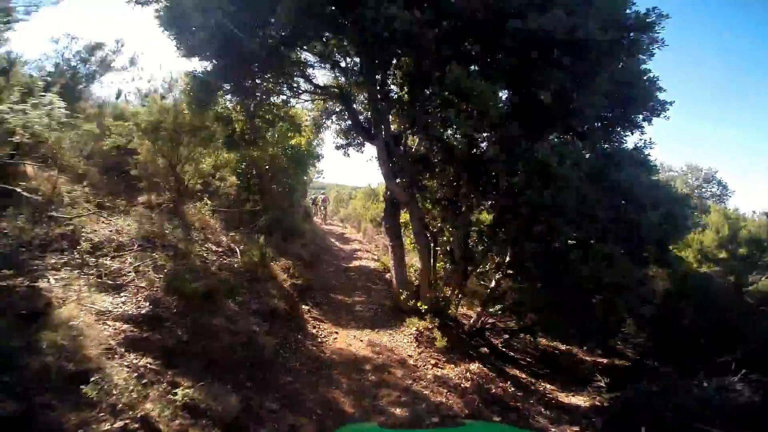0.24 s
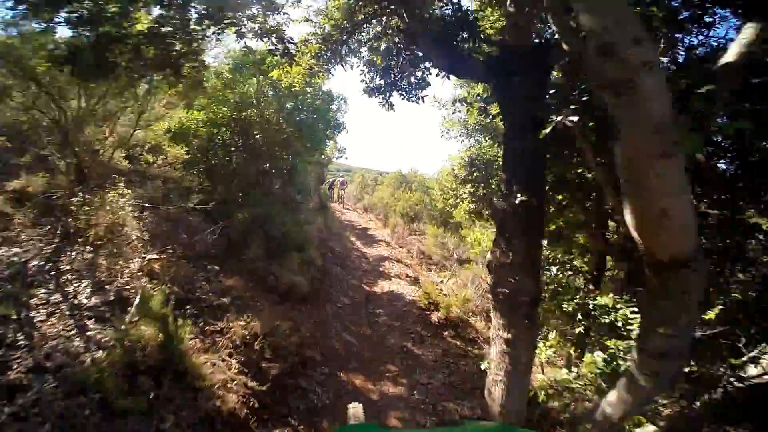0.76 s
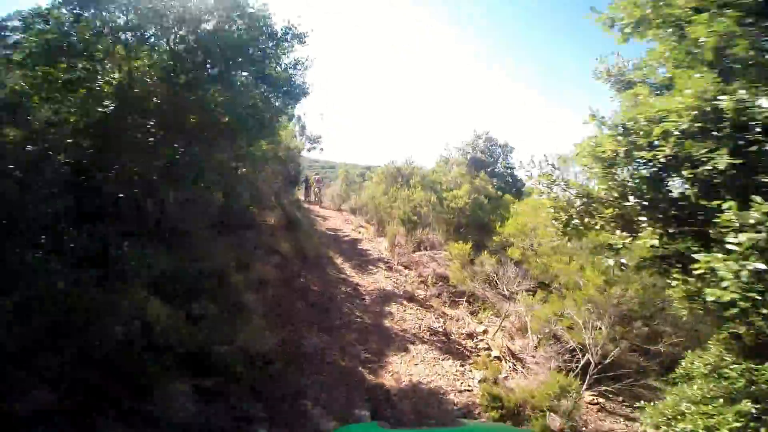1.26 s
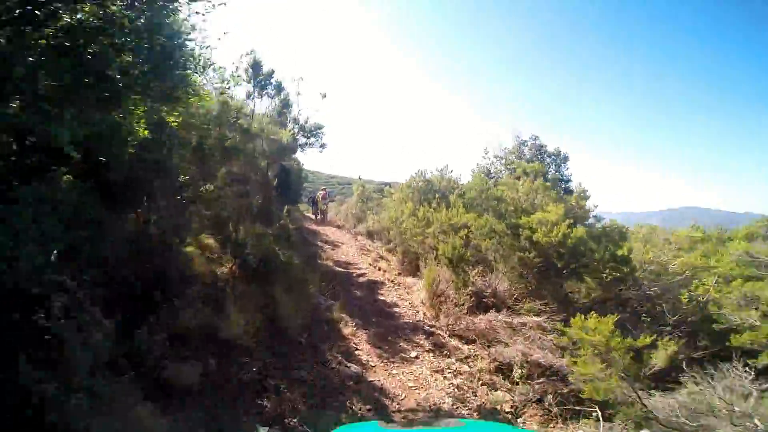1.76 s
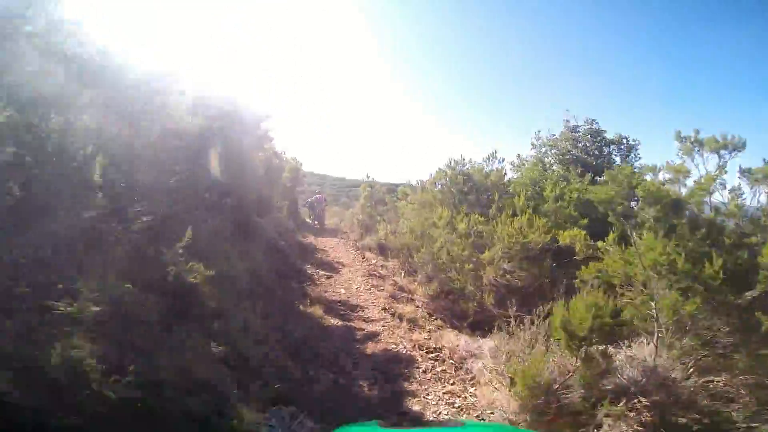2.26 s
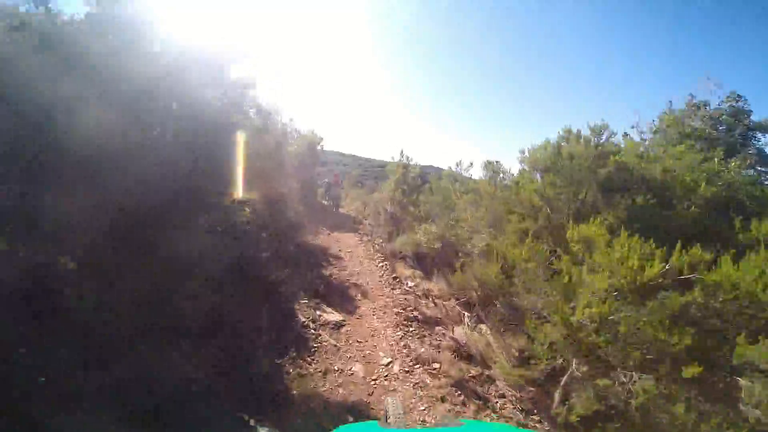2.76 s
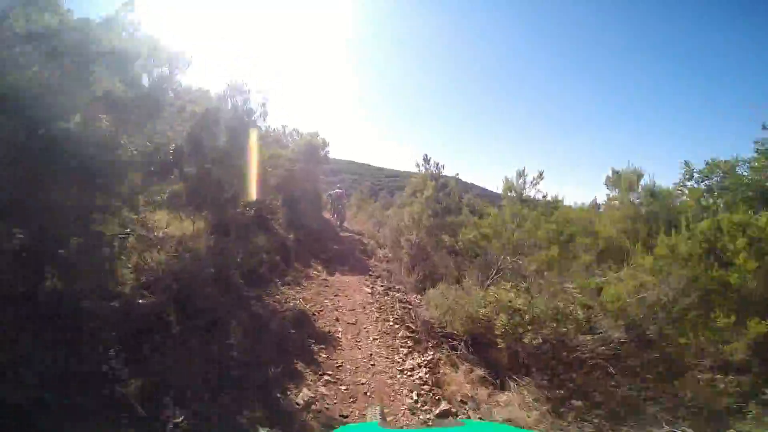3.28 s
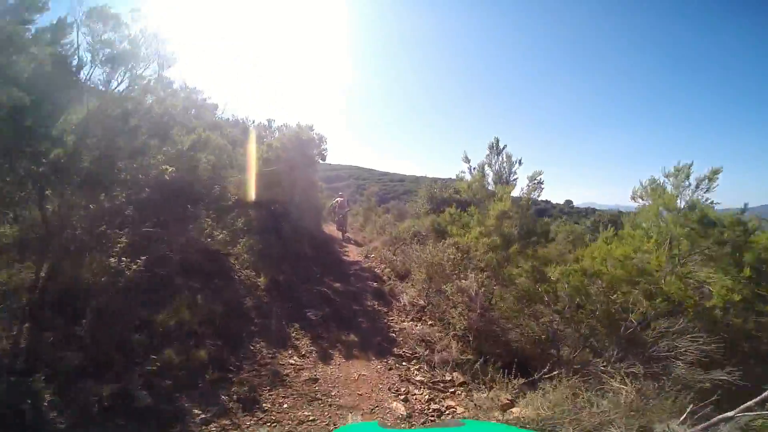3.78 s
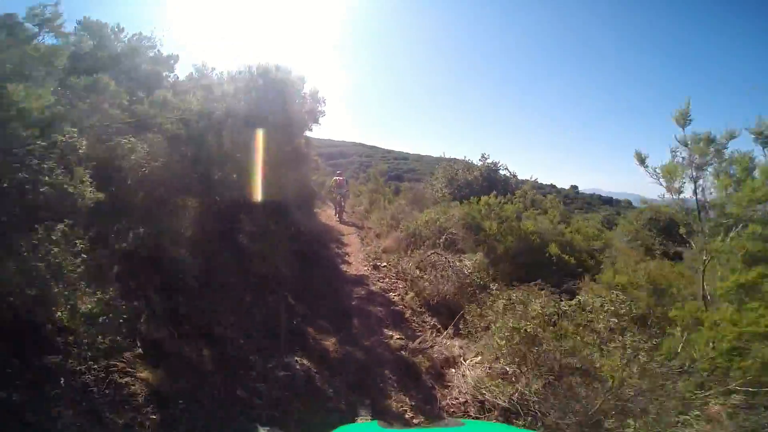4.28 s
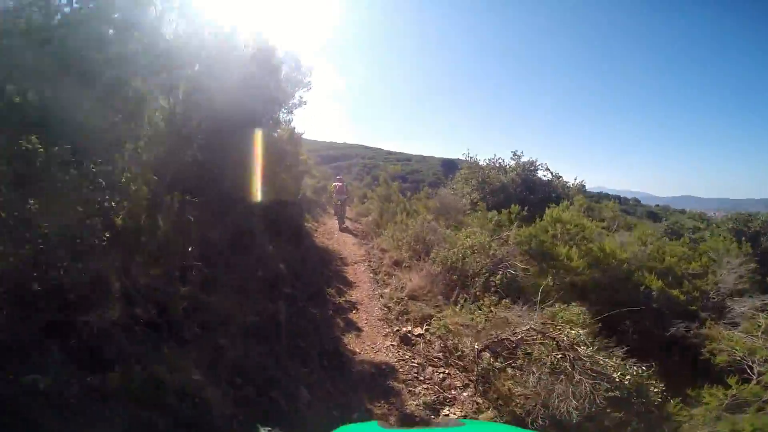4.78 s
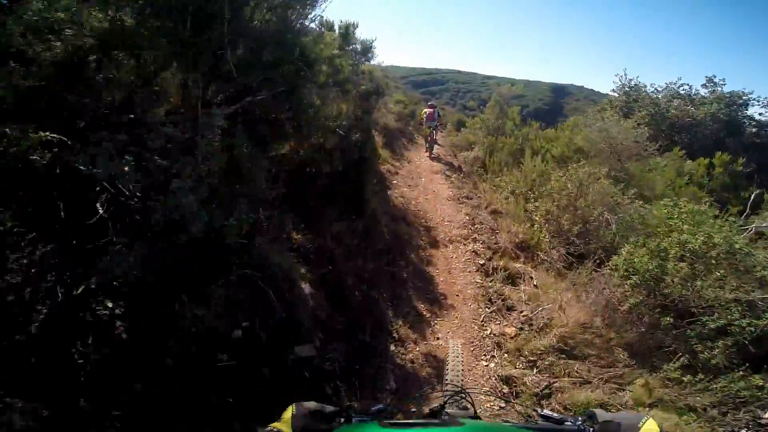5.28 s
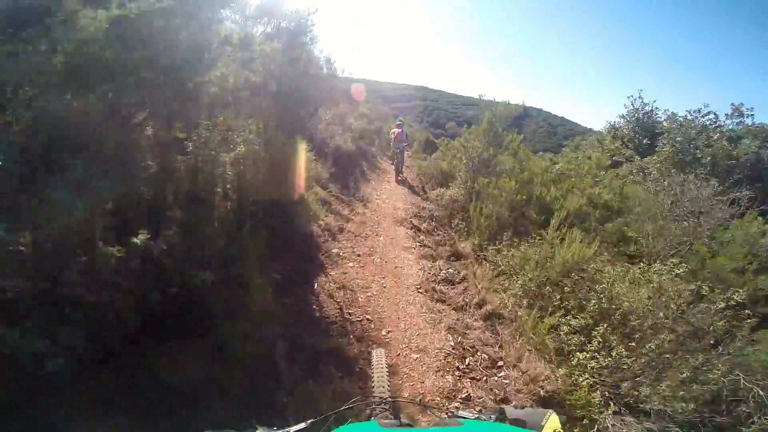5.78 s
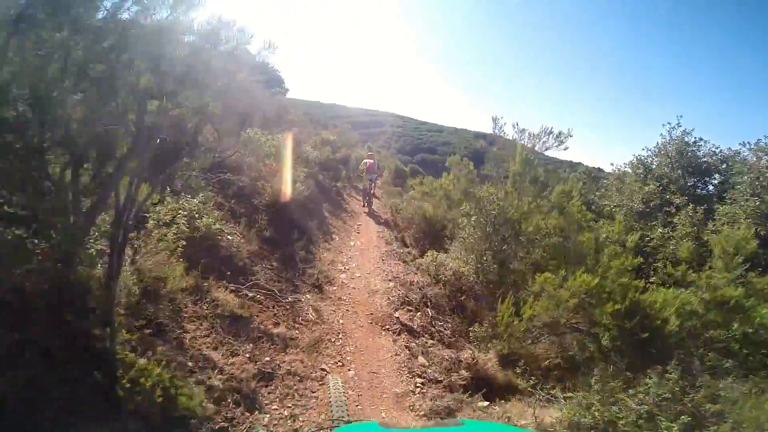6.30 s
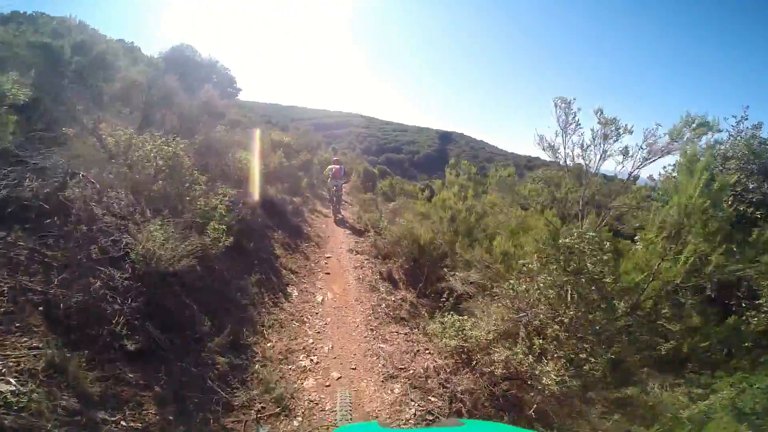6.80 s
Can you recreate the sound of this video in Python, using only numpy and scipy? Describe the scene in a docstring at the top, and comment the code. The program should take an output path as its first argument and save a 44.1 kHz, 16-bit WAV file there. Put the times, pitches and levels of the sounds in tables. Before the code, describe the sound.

Tyres crunch over loose stones with dull rattles, sharp knocks and one crisp twig rap, while wind and shaking rumble at the enclosed microphone.

```python
"""Mountain bike on a stony trail

A mountain bike rolls down a stony dirt trail, heard from inside a closed case on the rider.
Gravel is a crowd of tiny random clicks that ring the case; knocks and rattles are short dying tones.
Rolling tyres, dust, twigs and wind are noise shaped to a spectrum; hard jolts are single slow swings.
The shaking mount is a slow uneven wave, a stiff twig raps once, and a brake scrapes and squeals briefly."""
import sys
import numpy as np
from scipy import signal
from scipy.fft import rfft, irfft, next_fast_len
from scipy.io import wavfile
from scipy.ndimage import uniform_filter1d

SR = 44100
rng = np.random.default_rng(int(sys.argv[2]) if len(sys.argv) > 2 else 0)


def log_audio(samples):
    """Write samples as a 16-bit WAV file to the path given in sys.argv[1]."""
    # one column per channel
    frames = np.atleast_2d(samples).T
    # limit to full scale, then quantise
    limited = np.clip(frames, -1, 1)
    pcm = np.round(limited * 32767).astype(np.int16)
    wavfile.write(sys.argv[1], SR, pcm)


N = 310905
TIME = np.arange(N) / SR


def gain_of(db):
    """Turns decibels into a plain multiplier."""
    return 10 ** (np.asarray(db) / 20)


def evened(x):
    """Scales a sound so that its average strength (rms) is one."""
    return x / np.sqrt(np.mean(x ** 2) + 1e-20)


def follow(curve, axis=1):
    """Reads one column of a table at every sample, with straight lines between the rows."""
    columns = np.transpose(curve)
    return np.interp(TIME, columns[0], columns[axis])


def around_median(curve):
    """How far a table's level in dB lies above or below its usual value."""
    level_db = follow(curve)
    return level_db - np.median(level_db)


def add(mix, start_s, sound):
    """Lays a sound into the mix from a given moment."""
    part = mix[max(round(start_s * SR), 0):][:len(sound)]
    part += sound[:len(part)]


def filtered(x, order, hz, kind="lowpass"):
    """Keeps only the low pitches, or only a band of them."""
    return signal.sosfilt(signal.butter(order, hz, kind, fs=SR, output="sos"), x)


def coloured(x, spectrum):
    """Makes each pitch as strong as the spectrum says, joining its points on a log-pitch axis."""
    hz, db = np.transpose(spectrum)
    size = next_fast_len(len(x))
    bins_hz = np.fft.rfftfreq(size, 1 / SR)
    shape_db = np.interp(np.log(bins_hz + 1), np.log(hz), db)
    return evened(irfft(rfft(x, size) * gain_of(shape_db), size)[:len(x)])


def drift(per_s):
    """Slow chance: random heights, so many a second, joined by straight lines."""
    heights = rng.standard_normal(4096)
    return evened(np.interp(TIME * per_s, np.arange(len(heights)), heights))


def grains(per_s, spread_db):
    """A random train of tiny impacts, most of them weak."""
    size = gain_of(spread_db * np.minimum(rng.exponential(1, N), 4))
    return size * rng.choice([-1, 1], N) * (rng.random(N) < per_s / SR)


# The tones the case rings with when struck.
# Columns: pitch_hz, relative level_db, ring_s (time to fade by 60 dB)
CASE = [(640, -4, 0.012), (991, -5.5, 0.051), (1310, 6, 0.016), (1393, 6, 0.0092), (1570, 8, 0.013),
        (1895, -2, 0.023), (2195, 9.5, 0.0088), (2487, 6, 0.0094), (2595, -14, 0.051)]


def case_modes(t):
    """Each natural tone of the case rings and fades at its own rate; one row a tone."""
    hz, db, ring_s = np.transpose(CASE)[:, :, None]
    return gain_of(db - 60 * t / ring_s) * np.sin(2 * np.pi * hz * t)


# Moments when the tyres bite and the crunch swells and brightens.
# Columns: peak_s, relative swell_db (the gravel scales it for loudness and for brightness)
SURGES = [(.38, 1), (.98, 1.5), (1.39, 2), (1.72, 2.5), (2.3, 1.5), (3.42, 1.5), (4.19, 1.5), (4.32, 1),
          (4.78, 1), (5.55, 1), (6.2, 1), (6.72, 2)]


def surge(width_s=0.057):
    """Each surge rises and falls as a bell; all are added up in dB."""
    return sum(db * np.exp(-((TIME - peak_s) / width_s) ** 2 / 2) for peak_s, db in SURGES)


# How stony the ground is under the tyres.
# Columns: time_s, crunch level_db (before the gravel's own level and swells)
GROUND = [(0, -51), (0.5, -53), (1.2, -53.5), (1.45, -53), (1.68, -54.5), (2.25, -51.5), (2.85, -51),
          (3.22, -53.5), (3.55, -50), (3.85, -52.5), (4.15, -51), (4.62, -54), (4.8, -52.5), (5.15, -54.5),
          (5.45, -52.5), (5.9, -54), (6.3, -55), (7.05, -53)]


def gravel(level_db=1, clump_db=1.62, own_share=1.0, wander_db=1.35, low_hz=620, top_hz=3100,
           split_hz=1800, surge_gain=0.97, surge_bright=4.6, rest_tilt_db=-3.5):
    """Stones shift under the tyres in clumps; each tone of the case gets its own mix of clicks."""
    shared = evened(grains(per_s=1000, spread_db=2.5))
    swell_db = surge()
    fine_db = rest_tilt_db + surge_bright * swell_db  # a biting tyre grinds finer grit
    crunch = np.zeros(N)
    for (hz, _, _), ring in zip(CASE, case_modes(np.arange(1200) / SR)):
        clicks = shared + own_share * evened(grains(per_s=2500, spread_db=4.0))
        tilt = np.tanh(4 * np.log(hz / split_hz)) / 2  # fine grit favours the higher tones
        tone_db = tilt * fine_db + wander_db * drift(11)
        crunch += signal.oaconvolve(clicks, ring)[:N] * gain_of(tone_db)
    crunch = filtered(crunch, 3, [low_hz, top_hz], "bandpass")  # the walls shut out treble
    # Flatten the slow level so that the lines below set it.
    crunch /= np.sqrt(uniform_filter1d(crunch ** 2, size=12000) + 1e-9)
    loudness_db = follow(GROUND) + level_db + surge_gain * swell_db + clump_db * drift(70)
    return crunch * gain_of(loudness_db)


# Tone colour of the rolling tyres. Columns: pitch_hz, relative level_db (per Hz)
ROLL = [(40, -8), (100, 10), (170, 1), (330, -1.5), (420, -5), (700, -13.5), (1100, -23.5), (2500, -19),
        (4000, -81)]
# Tone colour of the hissing dust. Columns: pitch_hz, relative level_db (per Hz)
HISS = [(500, 3.5), (1500, 6.5), (2600, 5), (3200, 2.5), (4600, 0), (5400, -2), (7000, -6), (8500, -10),
        (9900, -9), (10600, -10), (12400, -12), (13500, -24), (15200, -20)]


def tyres(roll_db=-49.0, hiss_db=-60, roll_follow=0.43, roll_sway=0.058, hiss_follow=0.14,
          whistle_db=-72, whistle_hz=5010):
    """Knobs drum on the dirt, harder over bumps, and dust hisses; both swell a little with the crunch."""
    effort_db = around_median(GROUND)
    bumpy_db = around_median(SWAY)
    roll_level_db = roll_db + roll_follow * effort_db + roll_sway * bumpy_db + 0.32 * drift(25)
    roll = coloured(rng.standard_normal(N), ROLL) * gain_of(roll_level_db)
    dust = rng.standard_normal(N) + 0.5 * evened(grains(per_s=900, spread_db=4.0))
    dust *= gain_of(0.4 * drift(30))
    hiss = coloured(dust, HISS) * gain_of(hiss_db + hiss_follow * effort_db)
    # A faint steady hiss in one narrow resonance.
    whistle = signal.lfilter(*signal.iirpeak(whistle_hz, 42, SR), rng.standard_normal(N))
    return roll + hiss + gain_of(whistle_db) * evened(whistle)


KNOCK_RISE_S, CONTACT_S = 0.00062, 0.002  # how fast a knock swells; how long the parts touch


def ping(t, hz, ring_s):
    """One ring that swells within a cycle or two, holds while the parts touch and dies away."""
    rise = (1 - np.exp(-t / KNOCK_RISE_S)) ** 2
    release = gain_of(-60 * np.maximum(t - CONTACT_S, 0) / ring_s)
    return evened(rise * release * np.sin(2 * np.pi * hz * t))


def knock(db, hz, ring_s, upper_db, clatter_db, case_db=-11, spread=1.41, rebounds_per_s=1400,
          settle_s=0.038, upper_hz=2257, upper_ring_s=0.012, wall_hz=2930):
    """A struck part rings and shakes the case; hard contact adds a higher ring, loose parts tap on."""
    t = np.arange(3000) / SR
    tock = ping(t, hz, ring_s) + gain_of(upper_db) * ping(t, upper_hz, upper_ring_s)
    case = filtered(case_modes(t).sum(0), 2, [hz / spread, hz * spread], "bandpass")
    is_tap = (rng.random(len(t)) < rebounds_per_s / SR) * (t > 2 * KNOCK_RISE_S)
    taps = rng.standard_normal(len(t)) * is_tap * gain_of(-60 * t / settle_s)
    clatter = signal.fftconvolve(taps, case)[:len(t)]
    hit = evened(tock) + gain_of(case_db) * evened(case) + gain_of(clatter_db) * evened(clatter)
    hit = filtered(hit, 5, wall_hz)  # the walls shut out treble
    onset_strength = hit[t < 0.005].std()
    return gain_of(db) * hit / onset_strength


# Single knocks of chain, frame and stones, loud and faint.
# Columns: start_s, level_db (over the first 5 ms), pitch_hz, ring_s (time to fade by 60 dB),
# upper_db (higher ring, relative to the main ring), clatter_db (relative to the knock's tones)
KNOCKS = [(.041, -41.5, 1380, 0.0097, -15, -25), (.163, -43, 1100, 0.009, -18, -3),
          (.553, -48, 1360, .02, -12, -2), (1.059, -47, 1460, .004, -3, -12),
          (1.468, -45, 1250, .01, -2, -12), (1.4755, -37, 1300, .02, -12, -7),
          (1.482, -39, 1410, .015, -10, -3), (1.5089, -28, 1350, .006, -9, -25),
          (1.512, -40.5, 2000, 0.024, -15, -14), (1.5147, -35.5, 1710, 0.034, -20, -5),
          (1.942, -43, 1290, .004, 2, -8), (1.962, -59, 1380, 0.011, -14, -16),
          (1.985, -47, 1270, 0.012, -14, -6), (2.2985, -34, 1240, .003, -6, -14),
          (2.3003, -40, 1770, 0.011, -7, -12), (2.324, -43.5, 1580, .03, -4, -8),
          (2.4112, -40, 1430, 0.013, -9, -3), (2.633, -45, 1350, .012, -9, -8),
          (2.75, -42, 1290, .007, -15, -17), (2.885, -37.5, 1260, 0.0074, -8, -15),
          (3.1145, -41.5, 1460, .005, -5, -5), (3.132, -45.5, 1400, .012, 4, 3),
          (3.662, -39, 1470, 0.018, -20, -22), (3.981, -40, 1280, 0.0089, -16, -2),
          (4.013, -42, 1430, .012, -18, -12), (4.034, -47, 1440, .01, -16, -12),
          (4.171, -43.5, 1430, 0.01, -6, -4), (4.23, -42.5, 1250, .008, -12, -9),
          (4.312, -53, 1260, .01, -5, -12), (4.364, -45.5, 1330, 0.022, -8, -6),
          (4.7047, -31, 1130, 0.0051, -13, -15), (4.708, -46, 1600, .018, -4, -8),
          (4.727, -39, 1630, 0.0029, -4, -10), (4.7297, -47, 1430, .006, -1, -4),
          (4.735, -45, 1380, .01, -9, -8), (4.809, -46, 1390, 0.018, -16, -5),
          (5.604, -44, 1390, .007, -22, -28), (5.642, -43.5, 1360, .008, 8, -9),
          (5.727, -46, 1400, .007, 0, -9), (5.8734, -40, 1330, .005, -14, -4),
          (5.9768, -39.5, 1330, .004, -5, -6.5), (6.188, -45, 1430, .015, -7, 2),
          (6.736, -47, 1480, .012, 10, -3), (6.984, -43.5, 1370, 0.0043, 4, -5)]


def knocks():
    """The bike meets the larger stones: each row is one contact; rows close together make one knock."""
    out = np.zeros(N)
    for start_s, *settings in KNOCKS:
        add(out, start_s, knock(*settings))
    return out


def rattles(per_s=5, level_db=-54, spread_db=2, pitch_hz=1530, scatter_octaves=0.32):
    """Small knocks at random moments, louder where the ground is stonier."""
    out, stony_db = np.zeros(N), around_median(GROUND)
    for k, (when, strength, pitch) in enumerate(rng.uniform(-1.2, 1, size=(100, 3))):
        start_s = (k + 0.5 + when) / per_s
        if 0 < start_s < TIME[-1]:
            db = level_db + spread_db * strength + np.interp(start_s, TIME, stony_db)
            hz = pitch_hz * 2 ** (scatter_octaves * pitch)
            add(out, start_s, knock(db, hz, ring_s=0.017, upper_db=-4, clatter_db=-7))
    return out


# Twigs that touch the case.
# Columns: start_s, level_db (at the crest), fade_s (time to fade by 60 dB), top_hz (treble limit)
TWIGS = [(0.869, -53, .025, 9000), (1.739, -56, .048, 8000), (2.298, -46, 0.02, 4240),
         (2.319, -49, .03, 5700), (3.573, -59, .03, 9000), (3.687, -65, .03, 9000),
         (4.018, -52, 0.039, 8000), (5.4225, -40.5, 0.026, 15000), (5.437, -60, 0.18, 15000),
         (5.493, -58, .03, 13000)]
# Tone colour of a snapping twig. Columns: pitch_hz, relative level_db (per Hz)
SNAP = [(600, -42), (1380, -14), (1800, -16), (2300, 12.5), (2850, 6), (3300, -3), (4800, 0.5),
        (5900, -7.5), (7200, -3), (8600, -14), (9400, -10), (10500, -8), (12000, -26), (15000, -19)]


def twigs(rise_s=0.007, crackle=0.5):
    """Dry twigs and grit scrape the case itself in tiny catches, so they keep their treble."""
    t, out = np.arange(6000) / SR, np.zeros(N)
    for start_s, db, fade_s, top_hz in TWIGS:
        roughness = np.exp(crackle * np.clip(rng.standard_normal(len(t)), -2, 2))
        catches = rng.standard_normal(len(t)) * roughness
        scrape = filtered(coloured(catches, SNAP), 6, top_hz)
        envelope = np.minimum(t / rise_s, 1) * gain_of(-60 * t / fade_s)
        add(out, start_s, gain_of(db) * evened(scrape) * envelope / envelope.max())
    return out


# A stiff twig raps the case once. Columns: start_s, level_db (added to every tone below)
RAP = (5.4238, 0)
# The tones of that rap. Columns: pitch_hz, level_db, ring_s (time to fade by 60 dB)
RAP_MODES = [(1346, -33.5, 0.055), (1550, -32.5, 0.035), (2200, -42, 0.033), (2260, -31.5, 0.039),
             (4980, -29, 0.012), (5550, -47, 0.028), (7350, -46, .025), (9170, -46.5, .025),
             (10340, -55, .03)]


def rap(rise_s=0.0009):
    """A direct blow on the case rings its wall crisply, treble and all."""
    t, out = np.arange(4000) / SR, np.zeros(N)
    ring = sum(gain_of(db - 60 * t / ring_s) * np.sin(2 * np.pi * hz * t)
               for hz, db, ring_s in RAP_MODES)
    start_s, level_db = RAP
    add(out, start_s, gain_of(level_db) * (1 - np.exp(-t / rise_s)) ** 2 * ring)
    return out


# One touch of the brake, from the first row to the last; the stutter moves both levels.
# Columns: time_s, scrape level_db, scrape pitch_hz, squeal level_db
BRAKE = [(.26, -73, 1444, -78), (.29, -49, 1450, -64), (.33, -49, 1271, -56), (.359, -58, 1289, -56),
         (.366, -50, 1318, -40.5), (.386, -42, 1350, -46), (.393, -54, 1450, -53), (.46, -56, 1536, -54.5),
         (.53, -57, 1350, -57), (.57, -57, 1320, -75)]


def brake(rub_width_hz=260, squeal_hz=1312, waver=0.023, stutter_hz=62, stutter_db=3):
    """The pad scrapes the disc in a fast stutter, its pitch sliding; it grips and the disc squeals."""
    stutter_phase = 2 * np.pi * np.cumsum(stutter_hz * (1 + 0.21 * drift(40.0))) / SR
    stutter = gain_of(stutter_db * np.sin(stutter_phase))
    # Slow complex noise, moved up to the sliding pitch, makes a narrow band of rubbing.
    noise = rng.standard_normal(N) + 1j * rng.standard_normal(N)
    friction = filtered(noise, 2, rub_width_hz / 2)
    slide = np.exp(2j * np.pi * np.cumsum(follow(BRAKE, axis=2)) / SR)
    scrape = evened((friction * slide).real)
    squeal = evened(np.sin(2 * np.pi * np.cumsum(squeal_hz * (1 + waver * drift(297.5))) / SR))
    touching = (TIME > BRAKE[0][0]) & (TIME < BRAKE[-1][0])
    rubbing = gain_of(follow(BRAKE)) * scrape + gain_of(follow(BRAKE, axis=3)) * squeal
    return touching * stutter * rubbing


# Gusts of air on the case. Columns: time_s, wind level_db (before the small random lumps)
GUSTS = [(0, -38), (0.09, -32), (0.15, -40), (0.3, -41), (0.43, -36), (0.56, -40.5), (0.68, -46),
         (0.78, -41), (0.96, -42.5), (1.05, -39), (1.25, -41), (1.4, -39), (1.8, -41.5), (1.92, -32.5),
         (2.38, -36), (2.52, -32), (2.78, -37), (2.9, -36), (3.16, -38), (3.27, -29.5), (3.48, -34.5),
         (3.56, -38), (3.95, -35.5), (4.15, -37.5), (4.33, -38.5), (4.52, -35), (4.85, -33.5), (5.0, -39),
         (5.15, -38.5), (5.28, -45), (5.5, -39), (5.88, -45.5), (6.12, -40), (6.38, -43), (6.53, -37),
         (6.7, -35.5), (6.92, -37), (7.05, -40)]
# Tone colour of the wind. Columns: pitch_hz, relative level_db (per Hz)
WIND = [(12, -8), (22, 8), (33, 3.5), (55, -7), (75, -7.5), (97, -5), (115, -15), (150, -25.5), (300, -39),
        (800, -59)]


def wind(lumps_db=1.44):
    """Eddies rumble on the case in long, uneven gusts."""
    eddies = coloured(rng.standard_normal(N), WIND + [(4000, -120)])  # nearly no treble
    # Flatten the slow level so that the gusts and lumps set it.
    eddies /= np.sqrt(uniform_filter1d(eddies ** 2, size=6000) + 1e-9)
    return eddies * gain_of(follow(GUSTS) + lumps_db * drift(12))


# Hard jolts of the mount.
# Columns: middle_s, peak level_db (before the treble is cut), swing_s (middle to peak)
JOLTS = [(2.452, -28, .002), (3.46, -31, .003), (4.773, -23, .003)]


def jolts(top_hz=125):
    """Each jolt is one swing to and fro: a dull thud in the rumble."""
    out = np.zeros(N)
    for middle_s, db, swing_s in JOLTS:
        age = (TIME - middle_s) / swing_s
        out += gain_of(db) * -age * np.exp((1 - age ** 2) / 2)
    return filtered(out, 5, top_hz)


# How hard the uneven trail shakes the rider.
# Columns: time_s, shake level_db (before the mount's own level and unevenness)
SWAY = [(0, -35), (0.1, -27.5), (0.3, -37), (0.8, -25.5), (1.07, -50.5), (1.25, -28.5), (1.7, -38.5),
        (1.95, -20), (2.3, -21), (2.78, -26.5), (3.3, -23), (3.55, -31.0), (4.05, -30.5), (4.55, -23),
        (4.85, -23.5), (4.96, -31), (5.4, -28), (6.0, -34.5), (6.18, -23.5), (6.38, -35), (6.75, -23),
        (7.05, -28.5)]


def shake(rate_hz=12, wobble=0.171, level_db=-0.5, overtone=0.23, third=0.11, uneven_db=1.4):
    """The mount nods about a dozen times a second, with one steep flank, pumping the air in the case."""
    phase = 2 * np.pi * np.cumsum(rate_hz * (1 + wobble * drift(12))) / SR
    nod = np.sin(phase) + overtone * np.sin(2 * phase) + third * np.sin(3 * phase)
    return evened(nod) * gain_of(follow(SWAY) + level_db + uneven_db * np.tanh(drift(16)))


def scene():
    """Everything meets at the one microphone in the case."""
    bike = gravel() + tyres() + knocks() + rattles() + brake()
    touches = twigs() + rap()
    air_and_mount = wind() + jolts() + shake()
    return (bike + touches + air_and_mount)[None]


def record(dry, edge_hz=15280, fade_s=0.012):
    """The microphone passes nothing much above its top pitch; the sound fades in and out briefly."""
    lowpass = signal.firwin(511, edge_hz, window=("kaiser", 9), fs=SR)
    limited = signal.oaconvolve(dry, lowpass[None], "same")
    nearest_end_s = np.minimum(TIME, TIME[-1] - TIME)
    return limited * np.clip(nearest_end_s / fade_s, 0, 1)


dry = scene()
out = record(dry)
log_audio(out)
```